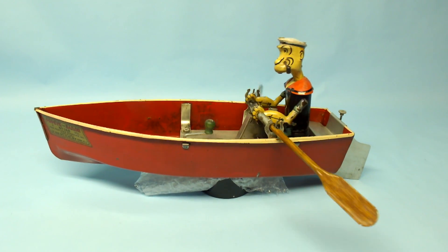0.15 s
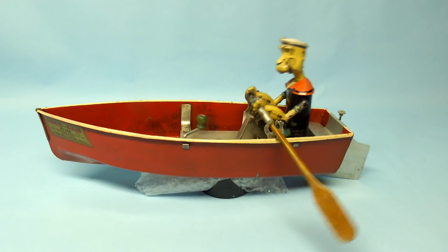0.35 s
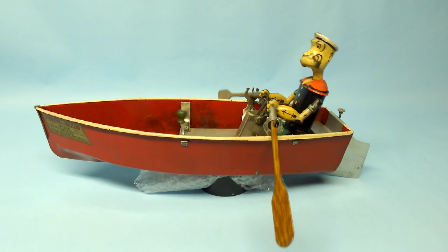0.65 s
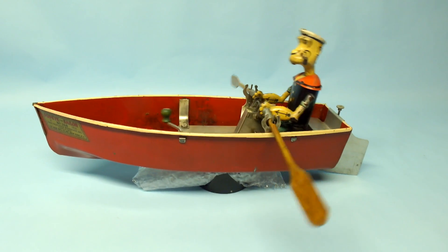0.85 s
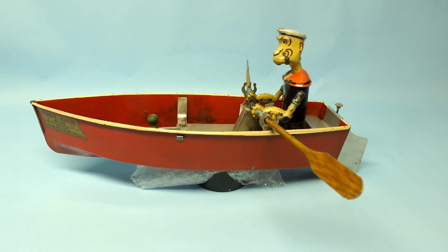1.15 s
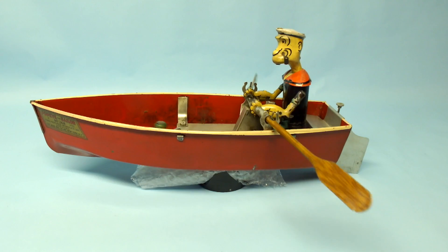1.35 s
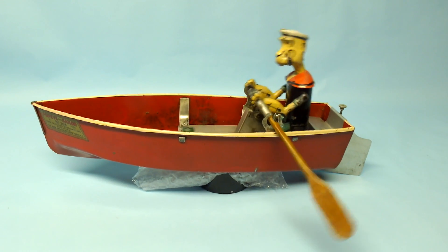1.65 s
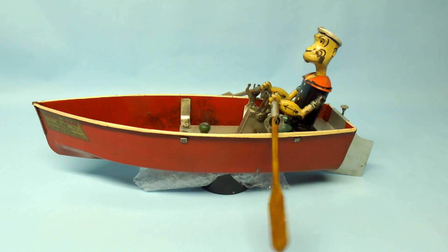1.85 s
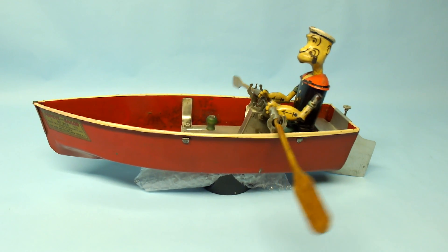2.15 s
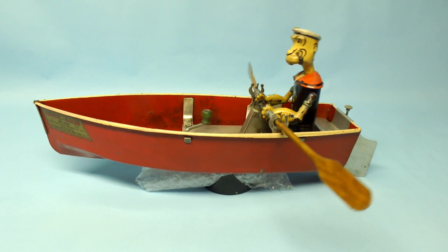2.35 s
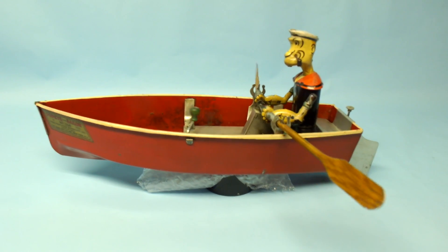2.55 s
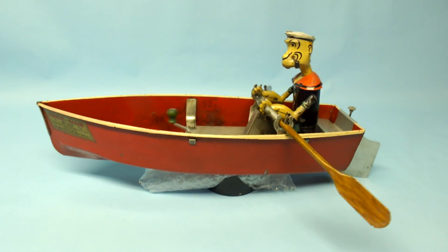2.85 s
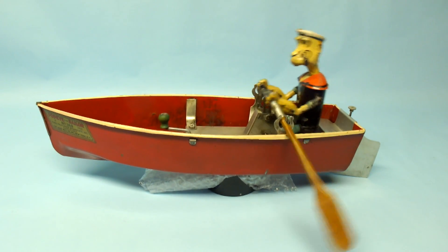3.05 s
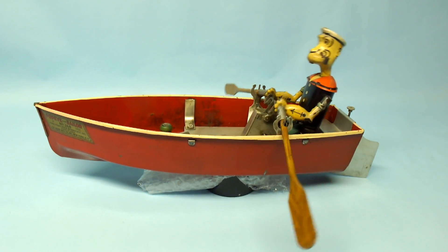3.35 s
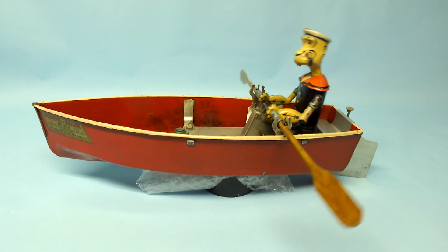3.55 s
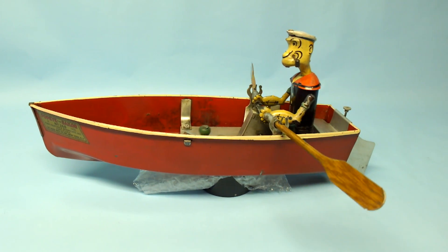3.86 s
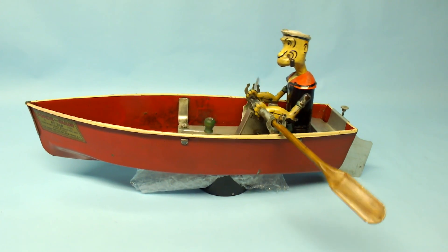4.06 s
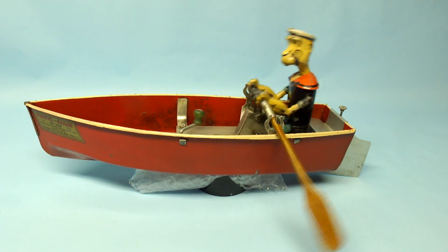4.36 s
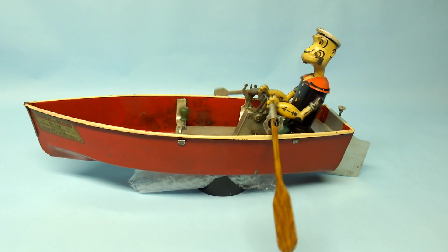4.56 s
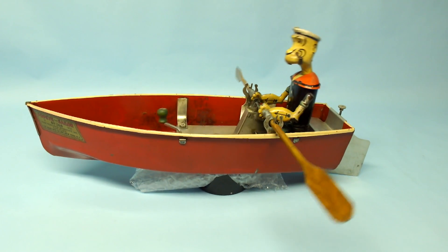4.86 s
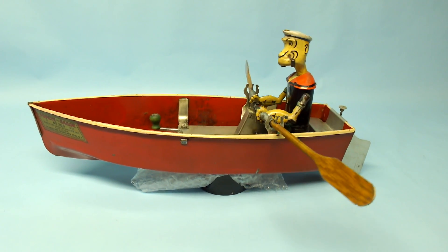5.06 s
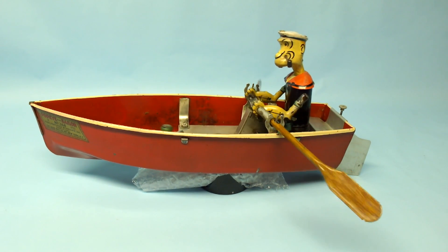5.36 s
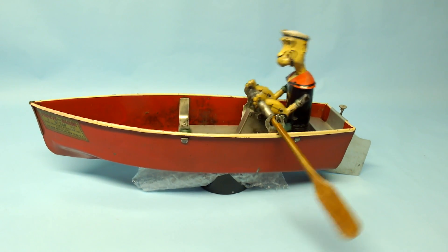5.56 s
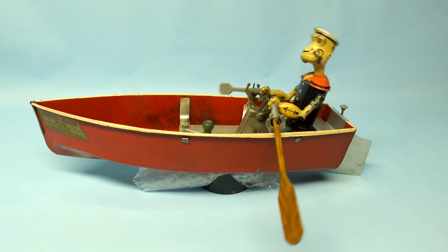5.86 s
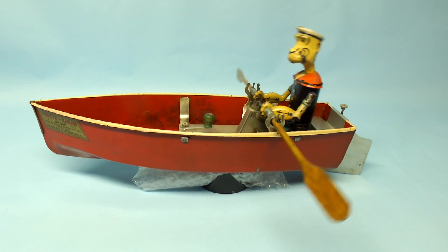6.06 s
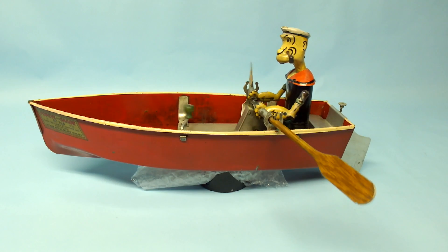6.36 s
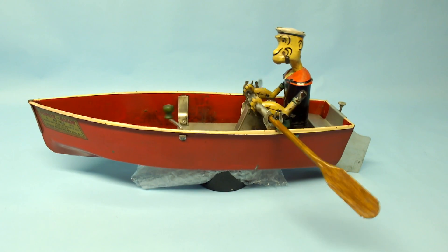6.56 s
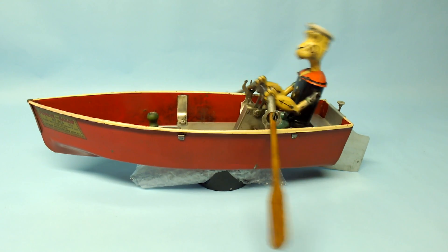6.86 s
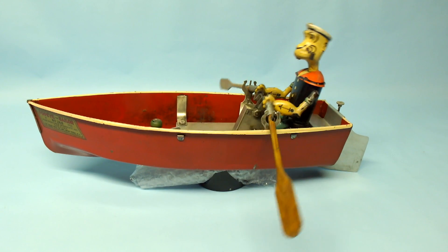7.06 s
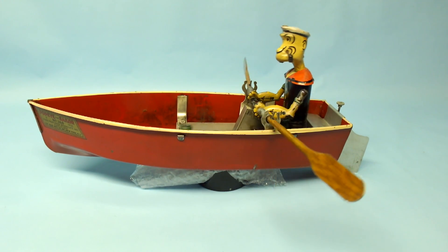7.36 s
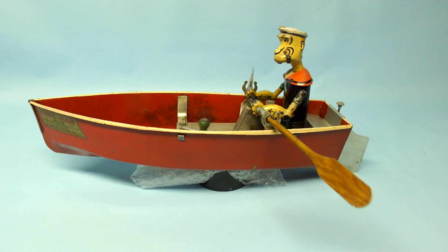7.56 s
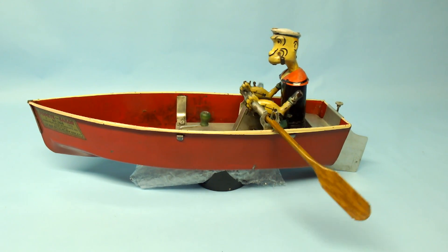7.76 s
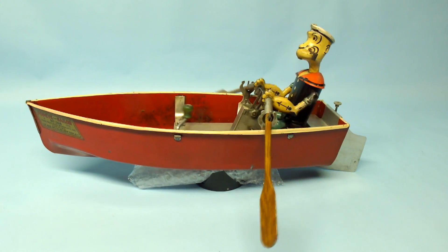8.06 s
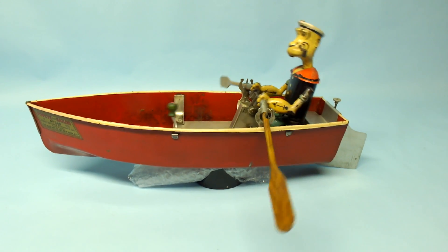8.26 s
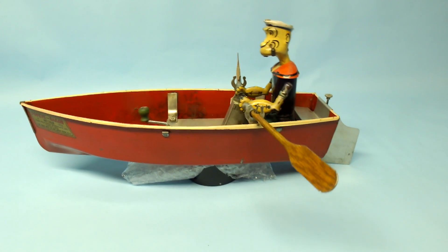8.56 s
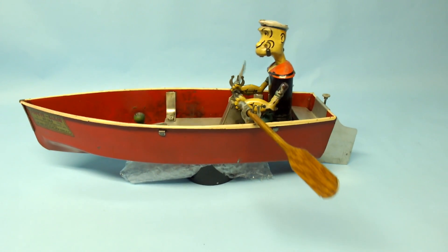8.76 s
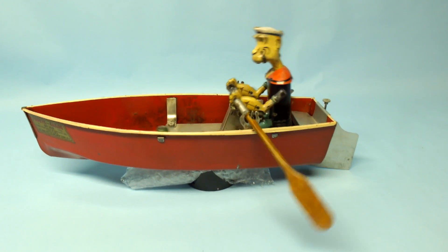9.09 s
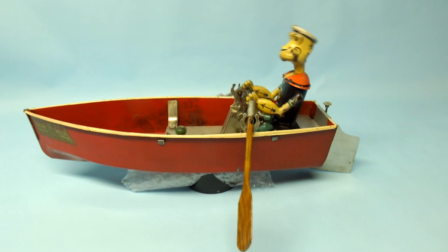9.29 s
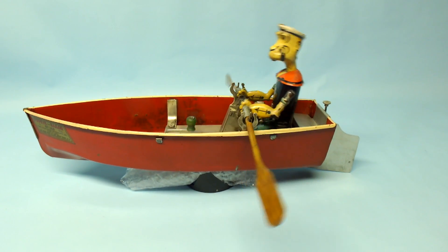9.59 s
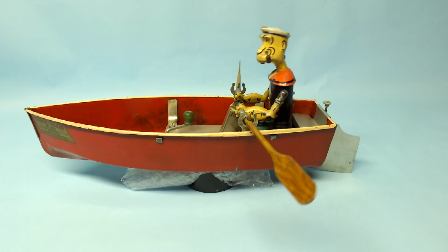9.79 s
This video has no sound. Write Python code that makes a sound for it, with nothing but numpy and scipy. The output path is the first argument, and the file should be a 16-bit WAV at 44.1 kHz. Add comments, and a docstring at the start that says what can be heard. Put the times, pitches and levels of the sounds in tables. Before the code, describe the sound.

Clockwork motor of a tin toy buzzes brightly and steadily, dipping regularly before hollow metallic knocks, with loose ticks and clacks in a quiet room.

```python
"""First one hears the whirr of a wind-up tin rowing boat, close up in stereo, in a quiet room.
Gear teeth chatter in bursts as the governor spins, loose rods rattle, and the tin hull rings with them.
Loose metal ticks, rods clack, and the motor sags under each oar stroke before a knock; some panels ping.
Late on the boat slips on its stand and its tone changes. Each contact is a train of impulses, filtered
by ringing contact points and by the colour of the tin."""
import sys
import numpy as np
from scipy import signal
from scipy.fft import rfft, irfft, next_fast_len
from scipy.io import wavfile
from scipy.ndimage import uniform_filter1d

SR = 44100
rng = np.random.default_rng(int(sys.argv[2]) if len(sys.argv) > 2 else 0)


def waveform_to_disk(signal):
    """Save audio, clipped to [-1, 1], as 16-bit WAV at the path in sys.argv[1]."""
    frames = np.transpose(np.atleast_2d(signal))
    scaled = np.clip(frames, -1, 1) * 32767
    samples = np.round(scaled).astype(np.int16)
    wavfile.write(sys.argv[1], SR, samples)


N = 437913
T = np.arange(N) / SR  # time of every sample, s


def amp(db):
    """Turns decibels into gain."""
    return 10 ** (np.asarray(db) / 20)


def unit(x):
    """Scales to an rms of 1."""
    return x / np.sqrt(np.mean(x ** 2) + 1e-20)


def read(points, hz):
    """Reads a curve at the given frequencies, with straight lines along a log frequency scale."""
    f, value = np.transpose(points)
    return np.interp(np.log(hz + 1), np.log(f), value)


def wander(per_s):
    """Smooth random drift of rms 1 that changes about per_s times a second."""
    size = next_fast_len(N, True)
    f = np.fft.rfftfreq(size, 1 / SR)
    slow = rfft(rng.standard_normal(size)) / (1 + (f / per_s) ** 4)
    return unit(irfft(slow, size)[:N])


def impacts(per_s, spread_db):
    """Impulses at random moments, of random sign and size."""
    happens = rng.random(N) < per_s / SR
    sign = rng.choice([-1, 1], N)
    return happens * sign * amp(spread_db * np.clip(rng.standard_normal(N), -2, 2))


def bursts(times, levels_db, rise_s, fade_s, first):
    """Each blow is one firm hit in a quick run of bounces that dies away."""
    bounces, force = impacts(5000, spread_db=1.0), np.zeros(N)
    for s, db in zip(times, levels_db):
        start = int(s * SR)
        age = np.maximum(T[start:][:SR // 5] - s, 0)
        swell = (1 - np.exp(-age / rise_s)) * np.exp(-age / fade_s)
        run = bounces[start:][:len(age)] * swell
        run[int(rise_s * SR):][:1] += first  # the firm hit
        force[start:start + len(age)] += amp(db) * run
    return force


def bells(modes, hz):
    """One resonance curve of height 1 for each row (frequency, width, ...)."""
    centre, width = np.transpose(modes)[:2]
    return 1 / (1 + (2 * (hz[:, None] - centre) / width) ** 2)


def coloured(x, db):
    """Minimum-phase filter: the metal rings only after it is struck."""
    cepstrum = irfft(np.log(amp(np.atleast_2d(db))))
    half = cepstrum.shape[1] // 2
    # folding the second half onto the first puts all the ringing after the hit
    cepstrum[:, 1:half] *= 2
    cepstrum[:, half + 1:] = 0
    return signal.oaconvolve(x, irfft(np.exp(rfft(cepstrum))), axes=1)[:, :N]


# how alike the ringing is on the left and right: f/Hz, likeness (0 to 1)
SIDE_LIKENESS = [(200, 0.26), (600, 0.96), (1400, 0.9), (2800, 0.73), (5000, 0.4), (7500, 0.094),
                 (15000, 0.05)]


def rings(t60, direct, patchy_db, count, size):
    """Contact points heard left and right: each has a sharp front, a metallic shimmer and its own resonances."""
    t, hz = np.arange(size) / SR, np.fft.rfftfreq(size, 1 / SR)
    fade = amp(-60 * t / t60) + amp(-14.5 - 60 * t / 0.32)  # main ring plus a weaker, longer one
    tail = rng.standard_normal((count, 2, size)) * fade
    tail /= np.linalg.norm(tail, axis=2, keepdims=True)
    # the sharp front comes about 2 ms in, at its own moment on each side
    front_at = rng.integers(90, 110, (count, 2))
    tail[np.arange(count)[:, None], [0, 1], front_at] += direct
    rough = rng.standard_normal((count, 1, len(hz)))
    patches = unit(signal.oaconvolve(rough, np.hanning(48)[None, None], "same"))
    z = rfft(np.roll(tail, 128, axis=2)) * amp(patchy_db * patches)
    # together the contact points excite all frequencies alike
    z /= np.sqrt(uniform_filter1d(np.mean(abs(z) ** 2, axis=0), size=14, axis=1))
    same = np.clip(read(SIDE_LIKENESS, hz), 0, 1)
    z[:, 1] = same * z[:, 0] + np.sqrt(1 - same ** 2) * z[:, 1]
    return irfft(z[:, ::-1])[..., :size * 3 // 4]


# broad colour of the tin body: f/Hz, level/dB
TIN_COLOUR = [(200, -23), (350, -18.5), (450, -24.5), (560, -9.5), (1000, -6), (1600, -5), (2300, -3.5),
              (3200, -2), (4800, -1), (5600, -5.5), (7000, -5.5), (9000, -4), (12500, -3), (15600, -9.5)]
# how strongly it sounds to the two sides: f/Hz, left-right level/dB
SIDE_BALANCE = [(200, 0.6), (600, -3.8), (1400, -5.5), (2600, -4.8), (3500, -1.3), (4500, -4.8),
                (7200, -3.7), (9800, -1.2), (12500, -5.4), (15600, -6.2)]
# resonances of the hull panels: f/Hz, width f/Hz, rise level/dB, left-right level/dB
PANEL_MODES = [(250, 33, 3, -5), (364.4, 44, 6, -3), (722, 31.5, 10.5, -0.5), (820, 14, 2.5, -3),
               (858, 24, 8, 2.5), (927, 13, 4, -2), (1095.3, 82, 10.5, -2.5), (1296, 48, 5.5, -1.5),
               (1390, 28, 5.5, -3.5), (1460, 11, 4.5, 5), (1875.5, 61, 10.5, 1.5), (1985, 16, 6, -7),
               (2260, 38, 1.5, 2), (2478, 72, 9, -4), (2740, 31, 9, -3), (2880, 28, 7.5, 2),
               (2967, 39, 7, -8.5), (3100, 74, 4.5, 2.5), (3215, 56, 4, 1), (3384, 67, 5, -7.5),
               (3590, 24, 6, 2), (4310, 140, 2, -3), (4790, 56, 3.5, 0), (4950, 115, 0.5, 1)]
# resonances of the motor's wheels and frame: f/Hz, width f/Hz, rise level/dB, left-right level/dB
WHEEL_MODES = [(6120, 400, 4, 0), (7370, 240, 4.5, -4), (7820, 260, 3.5, 0), (8440, 330, 5.5, -2),
               (9060, 210, 2.5, 0), (9340, 92, 9, 1), (10120, 96, 5, 0), (10950, 140, 3.5, -2),
               (11870, 270, 2.5, -8), (12500, 97, 5.5, -1), (15300, 760, 3, -5)]


def hull(force, colour, t60, direct, patchy_db=2, favour=0, count=6, size=8192):
    """Impacts land on several contact points, some favoured for a moment, and sound through the tin body."""
    odds = rng.gumbel(size=(count, N // 16 + 1))
    if favour:
        drift = uniform_filter1d(rng.standard_normal(odds.shape), size=200, axis=1)
        odds += favour * unit(drift)
    point = np.repeat(odds.argmax(0), 16)[:N]  # a new pick every 16 samples
    x = 0
    for k, ring in enumerate(rings(t60, direct, patchy_db, count, size)):
        struck = (force * (point == k))[None]
        x = x + signal.oaconvolve(struck, ring, axes=1)[:, 128:N + 128]  # takes off the delay in rings
    hz, modes = np.fft.rfftfreq(size, 1 / SR), np.vstack([PANEL_MODES, WHEEL_MODES])
    rise_db, side_db = (bells(modes, hz) @ modes[:, 2:]).T
    body_db = read(TIN_COLOUR, hz) + read(colour, hz) + rise_db
    balance_db = read(SIDE_BALANCE, hz) + side_db
    return coloured(x, body_db + np.array([[.5], [-.5]]) * balance_db)


def dip(s, build_s, release_s, curvature=1.58):
    """A load that builds up to 1 at time s and lets go again."""
    return np.interp(T, [s - build_s, s, s + release_s], [0, 1, 0]) ** curvature


# oar strokes; the motor labours until the rower tips back with a knock:
# knock t/s, sag level/dB, pull length t/s, knock level/dB before gain, clank brightness level/dB
OAR_STROKES = [(0.727, 6, .14, -15.5, -8), (2.031, 7.5, .2, -11.5, -13), (3.373, 2, 0.34, -15, -2),
               (4.654, 2, 0.077, -18, 2), (5.891, 1, 0.18, -17.5, -3), (7.046, 2, .12, -16, -2.5),
               (8.225, 6.5, .15, -17, -2), (9.479, 3, 0.23, -20, -6)]
# the gear train catches for a moment, or runs ahead: t/s, sag level/dB (below zero it runs ahead)
GEAR_SNAGS = [(1.57, 3), (1.72, -1), (1.77, 2), (3.98, -2.5), (4.22, 4), (7.81, 3), (7.97, -2.5), (9.03, 2)]


def motor_drive(uneven_db=0.2, uneven_per_s=6, lead_s=0.083, recover_s=.12, snag_s=0.071):
    """How hard the gear train runs, in dB from free running: it sags under each stroke and snag."""
    # the load peaks lead_s before the knock, then the motor picks up again
    pulls = sum(sag_db * dip(s - lead_s, pull_s, recover_s) for s, sag_db, pull_s, _, _ in OAR_STROKES)
    catches = sum(sag_db * dip(s, snag_s, snag_s) for s, sag_db in GEAR_SNAGS)
    return uneven_db * wander(uneven_per_s) - pulls - catches


def governor(speed, turn_hz=34.42):
    """The unbalanced governor presses the teeth together once a turn: a quick rise, a slower release, in dB."""
    turns = np.cumsum(turn_hz * speed * (1 + .09 * wander(6))) / SR
    return 1.25 * (np.sin(2 * np.pi * turns) + .4 * np.sin(4 * np.pi * turns))


# colour of the tooth contacts: f/Hz, level/dB
TOOTH_COLOUR = [(100, -21.5), (300, -11), (1000, -8.5), (1500, -4), (2100, -1.5), (2480, -0.5), (3300, 1),
                (7000, 0.5), (11000, 0), (14500, 5.5), (15800, -2.5)]


def gears(drive_db, sag=0.467, flutter_db=0.63, teeth_per_s=2600, level_db=-28.0):
    """Teeth chatter hardest once in each turn of the governor, which slows when the motor labours."""
    speed = amp(sag * (drive_db - np.median(drive_db)))
    press_db = governor(speed) + flutter_db * wander(100)
    hits = impacts(teeth_per_s * speed, spread_db=1.0)
    force = hits * amp(press_db) / np.sqrt(speed)  # evens out the power of sparser or denser hits
    whirr = hull(force, TOOTH_COLOUR, t60=0.045, direct=0.69, patchy_db=2.0, favour=.9, count=12)
    return amp(drive_db + level_db) * unit(whirr)


# colour of the rubbing rods: f/Hz, level/dB
RUB_COLOUR = [(40, -8), (130, -2), (300, 0), (1100, -3.5), (1700, -2.5), (2600, -3.5), (6000, -34)]


def linkage(drive_db, rattles_per_s=900, lurch_db=1.1, lurches_per_s=22, follow=0.22, level_db=-38.0):
    """Crank and rods rattle unevenly in their holes, less when the motor sags, and stir the low panel modes."""
    strength_db = lurch_db * wander(lurches_per_s) + follow * drive_db
    force = impacts(rattles_per_s, spread_db=2.0) * amp(strength_db)
    return amp(level_db) * unit(hull(force, RUB_COLOUR, t60=0.056, direct=0.42, patchy_db=3, favour=1.2))


# still air of the room, only the shape counts: f/Hz, level/dB
AIR_COLOUR = [(15, -9), (30, -1), (60, 7.5), (110, 6), (200, 5.5), (400, -1.5), (2000, -64), (15000, -63)]


def room(air_db=-67, hum_db=-71, mains_hz=120):
    """Low room noise, partly shared by both sides, and a faint, wavering mains hum."""
    z = rfft(rng.standard_normal((3, N))) * amp(read(AIR_COLOUR, np.fft.rfftfreq(N, 1 / SR)))
    air = irfft(z, N)
    phase = 2 * np.pi * mains_hz * T + 0.3 * wander(4.4) + np.array([[0], [.7]])
    hum = np.sqrt(2) * np.sin(phase) * amp(1.5 * wander(5))
    return amp(air_db) * unit(air[:2] + 0.23 * air[2]) + amp(hum_db) * hum


# the sharpest snaps of loose metal parts: t/s, level/dB before gain
SHARP_TICKS = [(0.175, -17), (0.4014, -24), (0.8081, -24), (0.848, -21), (1.8168, -15.5), (2.6894, -19),
               (3.7713, -18), (4.7136, -16), (5.916, -20), (6.8568, -22), (8.362, -17), (8.3923, -18),
               (8.838, -16), (9.0703, -19), (9.1054, -17), (9.2824, -21)]
# colour of a snap: f/Hz, level/dB
SNAP_COLOUR = [(300, -25), (1500, 0.5), (4000, -5.5), (8000, 6.5), (15000, 4)]


def ticks(drive_db, level_db=9.0, small_db=-13.5, spread_db=5.0, count=45):
    """Short bright snaps stand out of the whirr: a few sharp ones, and many small ones at random."""
    s, db = np.transpose(SHARP_TICKS)
    at = rng.integers(0, N, count)
    small = small_db + drive_db[at] + spread_db * rng.uniform(-1, 1, count)
    times, levels_db = np.append(s, T[at]), np.append(db + level_db, small)
    force = bursts(times, levels_db, rise_s=.0008, fade_s=0.002, first=0.97)
    return hull(force, SNAP_COLOUR, t60=0.023, direct=0.61, patchy_db=1.0, count=4)


# rods take up their play between strokes: t/s, level/dB before gain, brightness level/dB before gain
ROD_CLACKS = [(0.249, -23, -3), (0.65, -29, 1), (1.311, -30, -4), (1.519, -24.5, -3), (1.716, -27, -3),
              (2.143, -27, -1), (2.313, -28, -2), (2.876, -27, -6.5), (3.644, -27.5, -2), (4.19, -25, -5),
              (4.907, -30, 5), (5.379, -29, 1), (5.619, -30, 5), (6.896, -28, -6), (7.766, -31, -2),
              (8.988, -30, 4), (9.28, -26, 0), (9.427, -25.5, -0.5), (9.517, -28, -1), (9.745, -25, 2)]
# colour of the dull blow to the hull: f/Hz, level/dB
BLOW_COLOUR = [(60, -10), (250, 1.5), (700, 2.5), (1100, -2), (1600, -9), (3000, -28), (8000, -40)]
# colour of the brighter clank of the rods: f/Hz, level/dB
CLANK_COLOUR = [(300, -12), (1200, -7), (2400, 2), (3500, -6), (6000, -9), (15000, -27)]


def knocks(thud_db=11.5, clank_db=12.0, clack_db=5.0, clack_bright_db=-1):
    """Each stroke and each clack is a dull blow to the hull with a brighter clank of the rods."""
    stroke_s, _, _, stroke_db, stroke_bright_db = np.transpose(OAR_STROKES)
    clacks = np.transpose(np.add(ROD_CLACKS, [0, clack_db, clack_bright_db]))
    s, db, bright_db = np.hstack([[stroke_s, stroke_db, stroke_bright_db], clacks])
    thud = bursts(s, db + thud_db, rise_s=0.0015, fade_s=0.012, first=1.6)
    clank = bursts(s, db + bright_db + clank_db, rise_s=.003, fade_s=0.014, first=2.2)
    dull = hull(thud, BLOW_COLOUR, t60=0.049, direct=1.2, patchy_db=-0.5)
    bright = hull(clank, CLANK_COLOUR, t60=0.043, direct=1.0, patchy_db=2)
    return dull + bright


# a rod slaps one panel and sets it ringing: t/s, f/Hz, peak level/dB before gain
PANEL_PINGS = [(2.914, 2480, -25), (3.31, 2750, -25), (3.374, 2490, -20.5), (3.403, 2480, -24),
               (4.659, 1870, -27), (4.984, 2410, -29), (5.385, 3100, -30.5), (7.058, 2580, -30),
               (8.708, 4310, -28)]


def pings(rise_s=0.0025, fade_s=0.0094, level_db=-4.5, side_db=-4):
    """A slapped panel swings up at its own pitch and dies away."""
    out = np.zeros(N)
    for s, hz, db in PANEL_PINGS:
        start = int(s * SR)
        t = T[:min(SR // 6, N - start)]
        envelope = (1 - np.exp(-t / rise_s)) * np.exp(-t / fade_s)
        swing = np.sin(2 * np.pi * (hz * t + rng.random())) * envelope
        out[start:][:len(t)] += amp(db + level_db) * swing / abs(swing).max()
    return out * amp(side_db * np.array([[.5], [-.5]]))


# how the motor's resonances change once the boat has slipped: f/Hz, width f/Hz, change level/dB
SLIPPED_MODES = [(1086, 48, 2.5), (2080, 130, 1.5), (2740, 120, -5), (3380, 150, 1), (4240, 190, 3),
                 (5750, 240, 1), (6600, 420, -4), (9400, 350, -3), (11900, 90, 1), (12500, 180, 3),
                 (13130, 200, -1), (14300, 140, 4.5)]


def reseated(x, slip_s=8.25, change_s=0.075, size=8192):
    """The boat slips on its stand, and the colour changes over as it settles into its new seat."""
    change_db = bells(SLIPPED_MODES, np.fft.rfftfreq(size, 1 / SR)) @ np.array(SLIPPED_MODES)[:, 2]
    shifted = coloured(x, change_db)
    return x + np.clip((T - slip_s) / change_s, 0, 1) * (shifted - x)


def scene():
    """The running toy in its room."""
    drive_db = motor_drive()
    boat = reseated(gears(drive_db) + linkage(drive_db) + knocks())
    return boat + room() + ticks(drive_db) + pings()


def record(dry, edge_hz=15800):
    """A steep low-pass filter takes away the highest treble."""
    low_pass = signal.firwin(511, edge_hz, window=("kaiser", 9), fs=SR)
    return signal.oaconvolve(dry, low_pass[None], "same")


dry = scene()
out = record(dry)
waveform_to_disk(out)
```